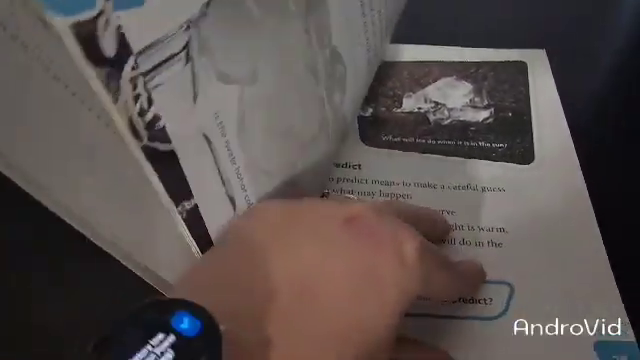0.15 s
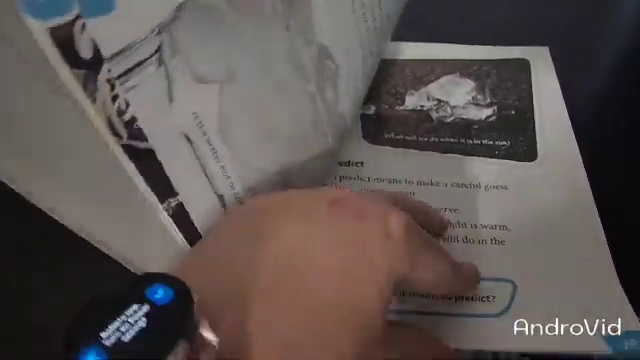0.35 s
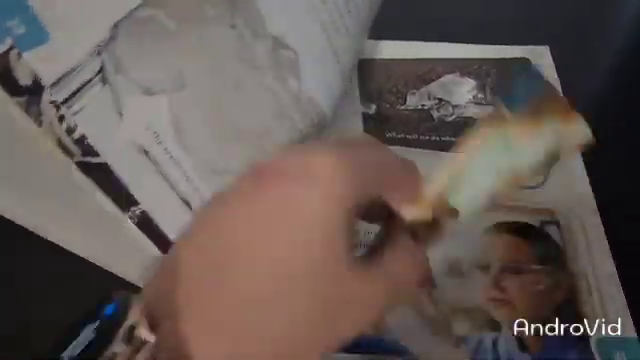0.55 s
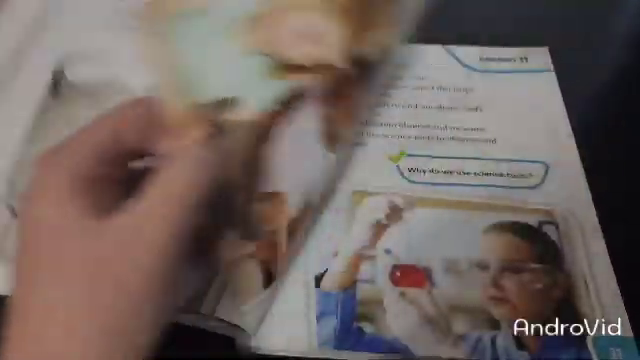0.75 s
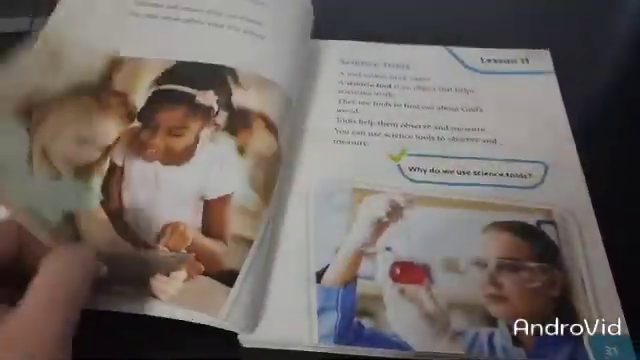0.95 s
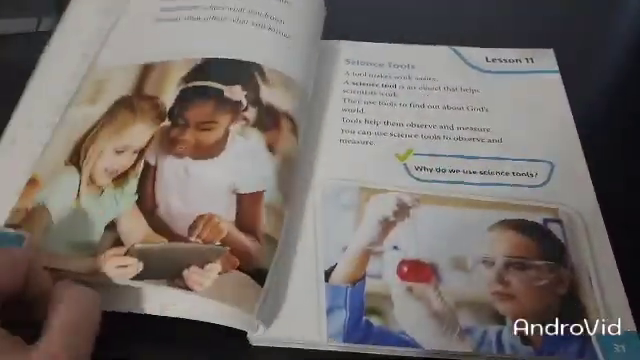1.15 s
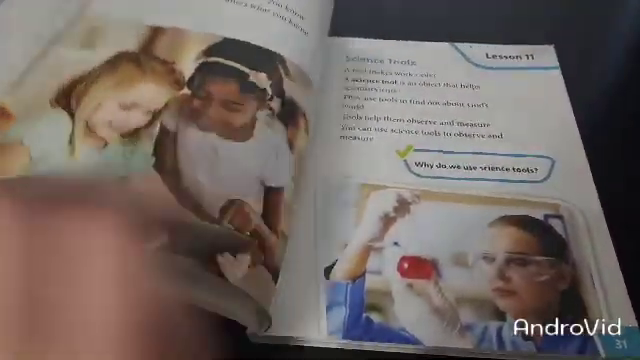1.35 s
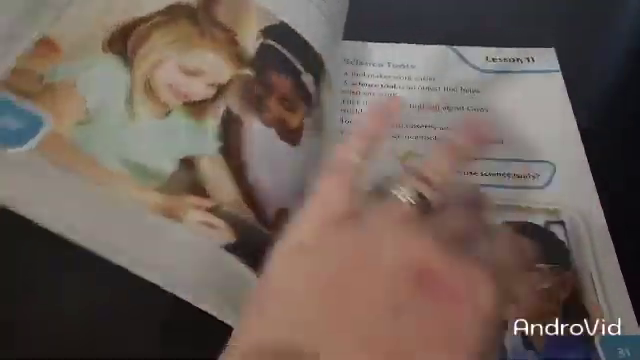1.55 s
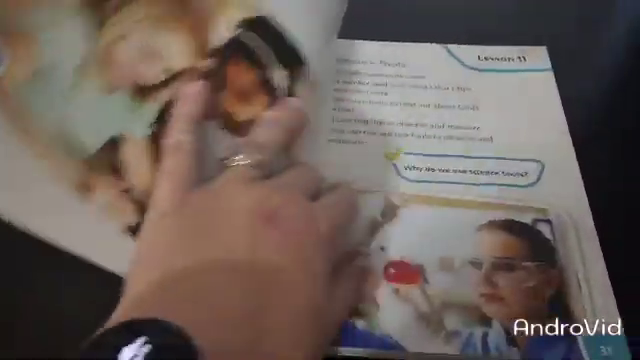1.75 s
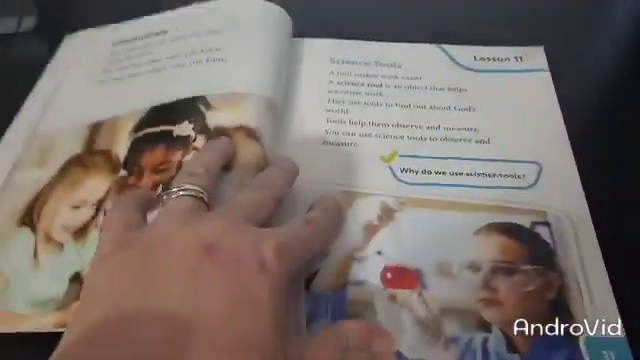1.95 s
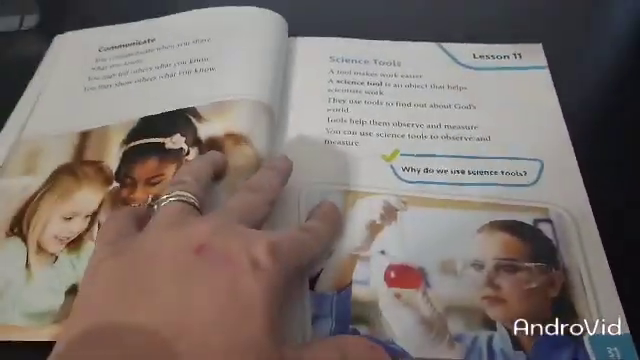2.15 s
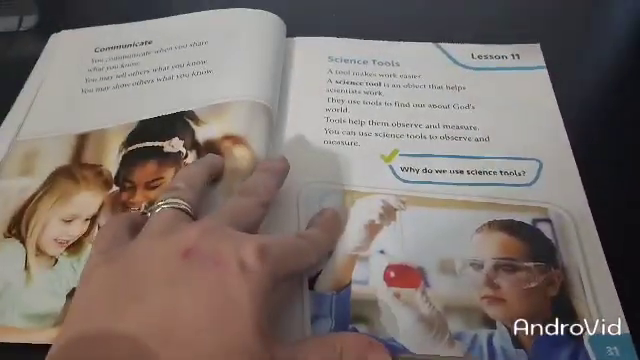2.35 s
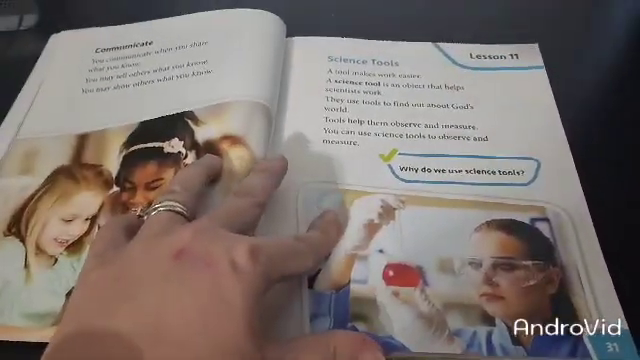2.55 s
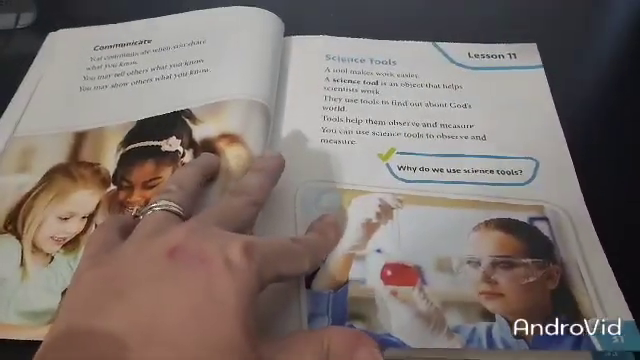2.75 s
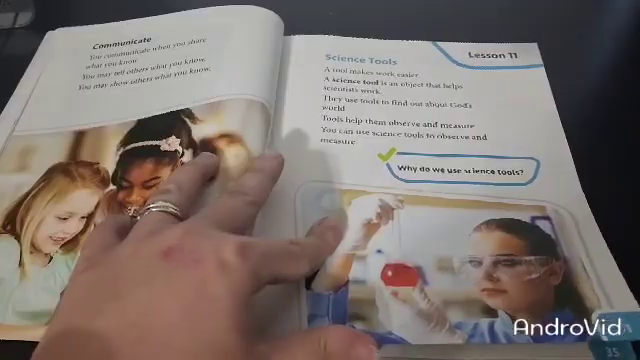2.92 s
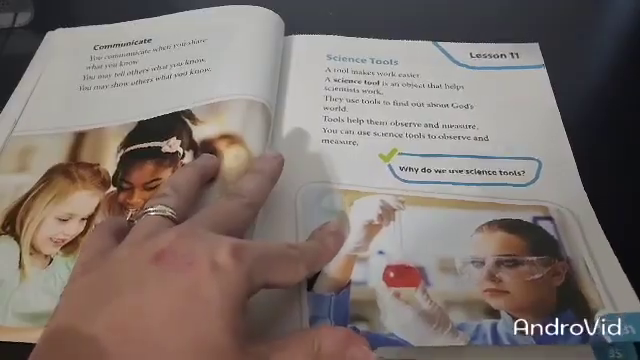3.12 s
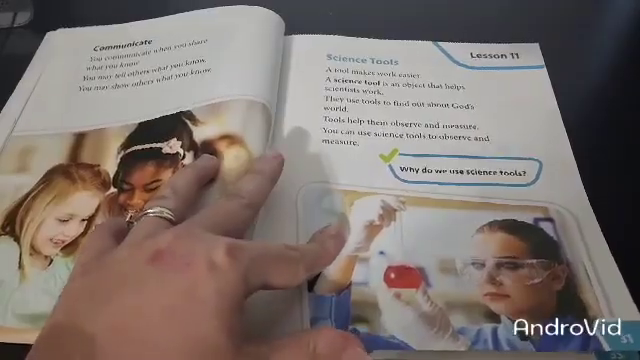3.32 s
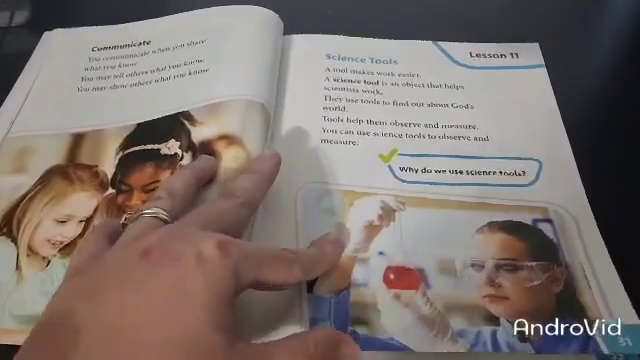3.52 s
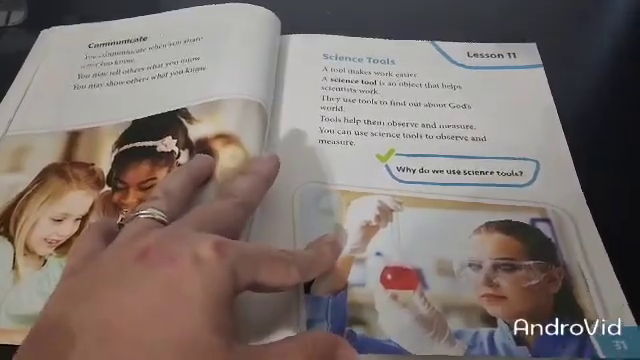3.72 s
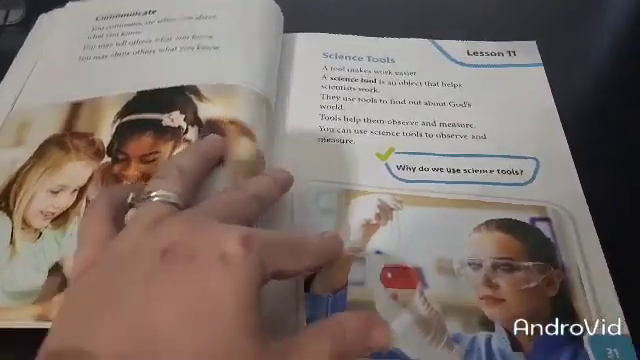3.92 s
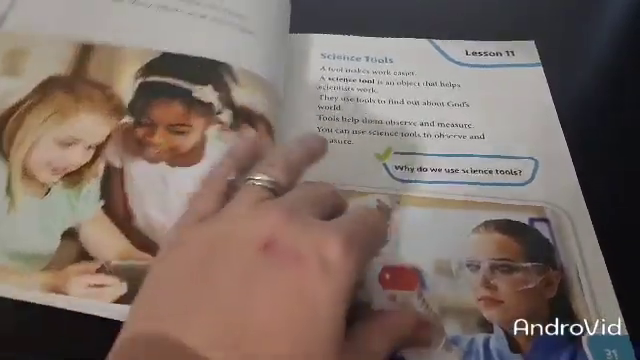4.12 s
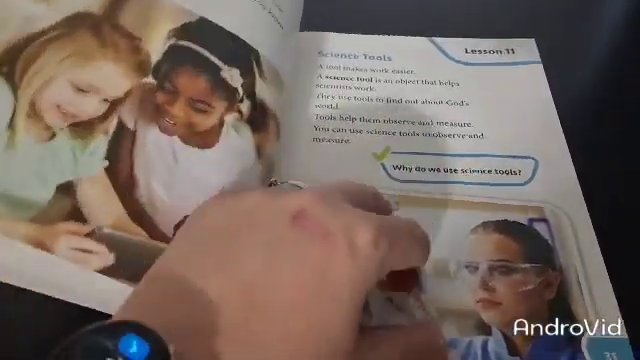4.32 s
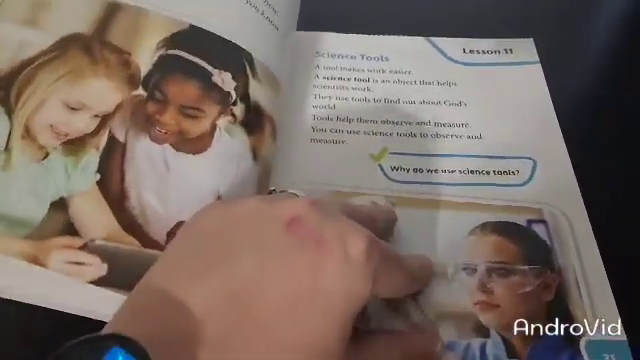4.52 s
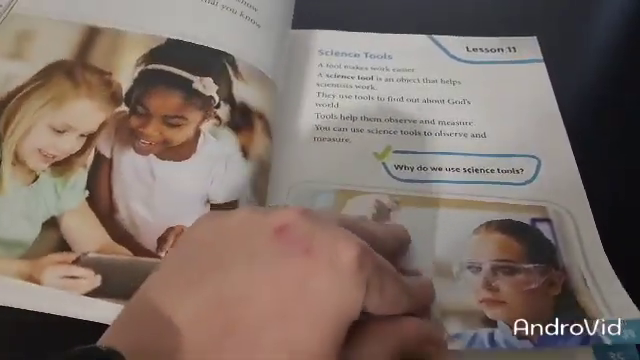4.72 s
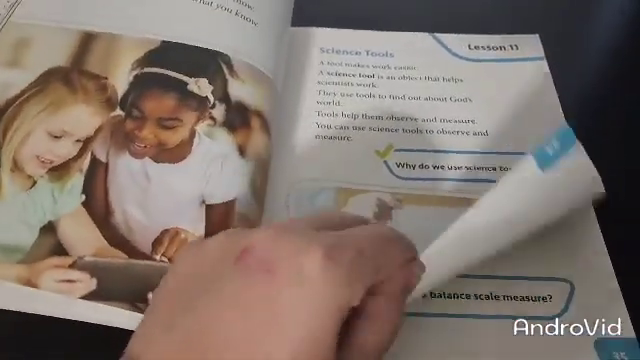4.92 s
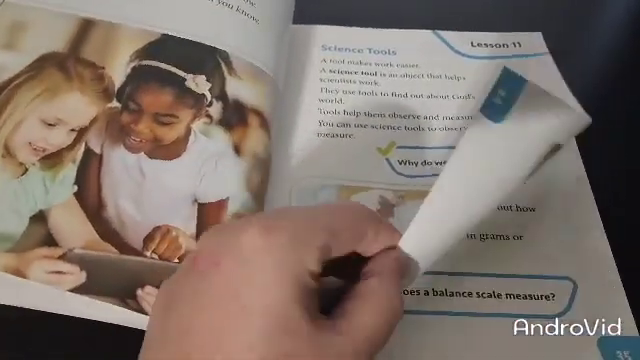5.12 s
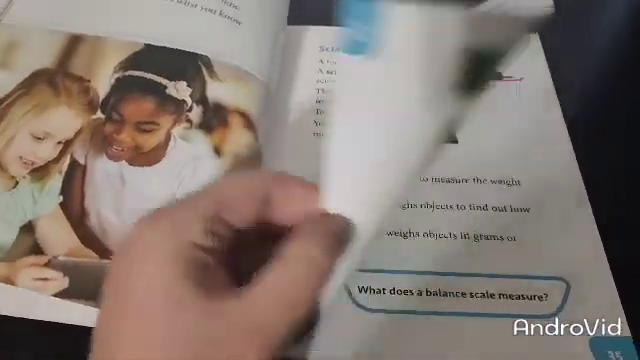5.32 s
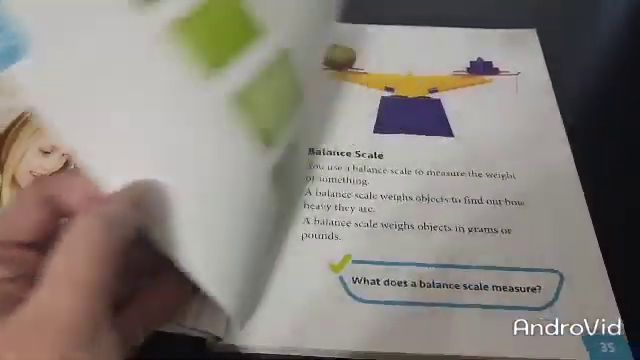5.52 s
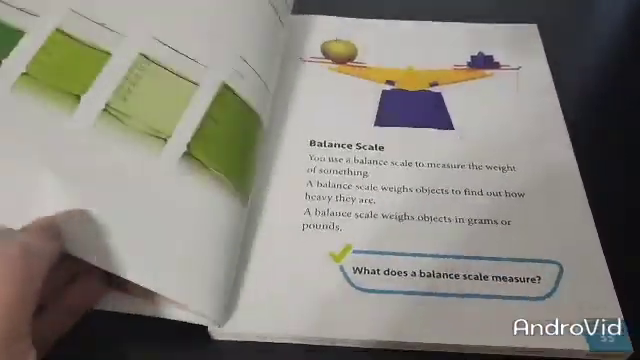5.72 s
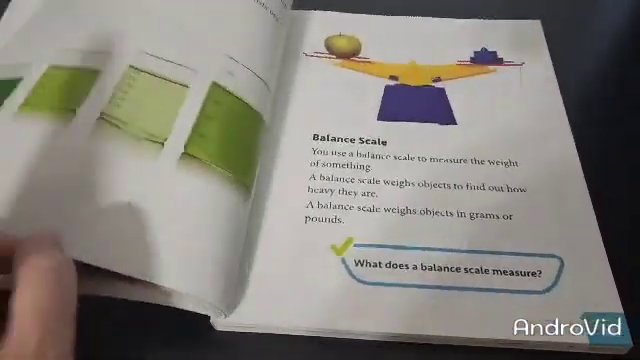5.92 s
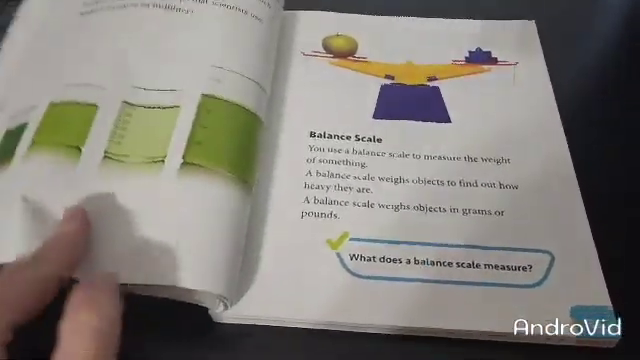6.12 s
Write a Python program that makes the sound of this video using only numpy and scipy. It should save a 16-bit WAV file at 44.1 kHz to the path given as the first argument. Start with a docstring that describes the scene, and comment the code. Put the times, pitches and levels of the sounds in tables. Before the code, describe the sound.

Close, dry stereo sound of a book handled on a table indoors. Dense paper rustle and short finger strokes, a page landing with bright crackling snaps, softer strokes and a thump as it is pressed flat. Almost still for nearly two seconds, then a sharp snap, flicking finger rubs, another sliding page, and one strong crack with a knock. Faint hiss and low rumble stay beneath.

```python
"""In a small quiet room, a hand turns glossy book pages on a table, close to a pair of microphone ports.
Sliding paper rustles by friction noise and sparse crackle; finger strokes slip as short rubbing bursts.
Creases snap as buckling pulses with ringing and crackle; the page block taps by damped modes and a boom.
Moving air, a wavering ventilation note, a low rumble and a faint hiss are shaped diffuse noise."""
import sys
import numpy as np
from scipy import signal
from scipy.fft import rfft, irfft
from scipy.io import wavfile
from scipy.ndimage import uniform_filter1d

SR = 44100
rng = np.random.default_rng(int(sys.argv[2]) if len(sys.argv) > 2 else 0)


def put_to_file(sound):
    """Save the sound as 16-bit audio at rate SR, in the file named by the first command-line argument."""
    columns = np.atleast_2d(sound).T  # one column per channel
    safe = np.clip(columns, -1, 1)
    whole_steps = np.round(safe * 32767)
    wavfile.write(sys.argv[1], SR, whole_steps.astype(np.int16))


N = 276507  # samples

# Levels are set ahead of the port response; spectra give only relative density.
# Sliding paper. Each row: time in seconds, level in dB, fine sheen in dB re papery middle,
# fold hollow in Hz, skin whisper in dB re papery middle.
RUSTLE_PATH = [(0.0, -56.5, -14, 1550, -29), (0.27, -67, -18, 1310, -25), (0.47, -54, -5.5, 1640, -33),
               (0.66, -59.5, 5, 1380, 1), (0.8, -56, -5, 1610, -11), (0.88, -48.5, -5.5, 1240, -25),
               (0.95, -55.5, -2.5, 1640, -18), (1.03, -45.5, 2.5, 1720, -27),
               (1.15, -54.5, -1.5, 1150, -13), (1.21, -66, -10, 1176, -23), (1.53, -68.5, -11, 1160, -8),
               (1.72, -59.5, 2.5, 920, 0), (1.9, -70, 4, 1090, 3.5), (2.02, -64.5, -6, 1000, -3),
               (2.2, -75.5, -9, 786, -20), (3.8, -80, -8.5, 1150, -12), (3.95, -71, -4, 1290, 3),
               (4.19, -61.5, -13, 1510, -15), (4.37, -63, -10, 1480, -23), (4.45, -66, -18, 1460, -19),
               (4.95, -69, -3.5, 1660, 3.5), (5.27, -62.5, -5, 1770, -20), (5.35, -65.5, -17, 860, -16),
               (5.54, -60.5, -6, 880, -13), (5.6, -55.5, -6, 910, -13), (5.78, -53.5, -6, 960, -11),
               (5.87, -63.5, -6.5, 1720, -10), (5.98, -52.5, -5.5, 1240, -18),
               (6.11, -59.5, -5.5, 1390, -16), (6.27, -58, -4.5, 2140, -14)]
# Lifted pages arching over the block. Each row: middle in seconds, half-length in seconds, hollow gain in dB.
PAGE_ARCHES = [(.38, .06, 7), (1.675, .02, 9), (1.84, .04, 6), (5.45, .07, 11), (5.66, .11, 11),
               (6.2, .06, 6)]
# Finger strokes across a page. Each row: start in seconds, peak in dB, body and sheen in dB re papery
# middle, hold in seconds, ring in Hz, ring in dB re rub.
FINGER_SLIPS = [(0.337, -48, -4, -14, 0.025, 1400, -14), (0.431, -39.5, -29, -11, 0.064, 1840, -1.5),
                (0.566, -38, -29, -10, 0.027, 4500, -26), (0.631, -31, -21, -7, 0.049, 1680, -9),
                (0.805, -40, -6, -15, 0.053, 1910, -13.5), (1.09, -31, -15, -22, 0.031, 7050, -42),
                (1.229, -51.5, 3, -2, 0.065, 7550, -1), (1.663, -40, -5, -19, 0.018, 5200, -16),
                (1.982, -34, -8, -0.5, 0.034, 5070, -40), (2.366, -51.5, -34, -8, 0.025, 7700, -16),
                (3.064, -53, -8, -13, 0.047, 6000, -26), (3.187, -60, -17, -15.5, 0.033, 1660, -17),
                (3.481, -53.5, -2, -16, 0.032, 5400, -13), (3.515, -48, -13, -14, .04, 5240, -30),
                (3.912, -52.5, -4, -6, 0.042, 1550, -21), (3.995, -51.5, -18, -12, 0.026, 5700, 10),
                (4.194, -40.5, -13.5, -3, 0.11, 1340, -20), (5.012, -39.5, -29, -8, 0.036, 2220, -14),
                (5.052, -40.5, -7.5, 1.5, 0.019, 2200, -8), (5.147, -38.5, -7.5, -4.5, 0.013, 2130, -8),
                (5.194, -35.5, -3, -6, 0.0075, 4100, -18), (5.236, -37, -6.5, -2.5, 0.02, 2320, -12),
                (5.31, -45, -0.5, -12, 0.0082, 4400, -9), (5.458, -46.5, 3, -14, 0.029, 5270, -3),
                (5.619, -42, -3, 3, 0.096, 4640, -14), (5.699, -44, -10, -11, 0.057, 7600, 7),
                (6.016, -46, -6, 13, 0.006, 4500, -15), (6.131, -40.5, -20, -9, 0.022, 5660, -3)]
# Creases that let go. Each row: start in seconds, peak in dB, body and sheen in dB re papery middle,
# left-right difference in dB, ring in Hz, ring gain in dB, crackle in dB.
CREASE_SNAPS = [(0.9866, -19, 0, -18, -1, 3700, 15.5, 1), (0.9903, -14, -11, -54, 1, 2400, 19, -17.5),
                (0.9926, -13, -12, -24, 0, 3870, 20, 6), (1.0025, -27.5, -8, -15, -10, 6800, 20, -8),
                (1.0112, -20, -14, -17, 1, 3330, 31, -2), (1.022, -22, -15, -35, 7.5, 2980, 38, -5),
                (1.047, -32, -14, -12, 2, 3700, 7, -7), (1.1075, -43, -13, -16, 1, 6940, 7, -4),
                (1.9906, -23, 2.5, -19, -0.5, 1440, 16, -24.5), (3.808, -33.5, -21, -7, -5, 4320, -6, -17),
                (4.2401, -16.5, -24, -6, -7, 1750, 4, -10), (4.2417, -16, -6.5, 5.5, 7, 4470, 0, -11),
                (4.2427, -22, -32, 12, -21.5, 6540, -2, 8), (6.0265, -7, -5, -22, 0, 4040, 6.5, -18)]
# Pages and fingers landing on the block. Each row: start in seconds, peak of knock and scuff in dB,
# pitch in Hz, t60 in seconds, boom in dB, boom in Hz, scuff in dB re knock.
BLOCK_TAPS = [(0.618, -28.5, 895, 0.037, -70, 137, 6), (0.863, -39.5, 1106, 0.041, -45.5, 150, 2),
              (1.002, -25.5, 733, 0.061, -37.5, 248, 11.5), (1.122, -38.5, 750, 0.065, -42, 129, 7),
              (1.263, -39, 820, 0.097, -75, 200, 8), (1.734, -33, 865, 0.034, -44.5, 124, -5),
              (1.76, -44, 1040, 0.06, -47, 245, -15), (1.783, -51, 794, 0.023, -47, 312, -10),
              (1.991, -31.5, 674, 0.084, -47, 355, -12), (2.141, -48, 730, 0.11, -76, 138, -2.5),
              (3.917, -54, 940, 0.028, -62, 200, 5), (5.395, -50, 820, 0.03, -49.5, 332, 8),
              (5.634, -46, 910, 0.056, -54, 335, -1), (5.774, -40, 950, 0.031, -43, 282, 11),
              (5.896, -35, 1880, 0.01, -47, 325, -7), (6.011, -32, 940, 0.045, -36, 125, 9),
              (6.027, -25, 1230, 0.091, -40, 241, 20)]
# Air pushed by swinging pages and hands. Each row: middle in seconds, half-length in seconds, swell in dB.
AIR_WAFTS = [(0.0, 0.29, -62), (0.66, 0.21, -56), (0.9, 0.11, -56), (1.45, 0.068, -74), (1.73, 0.13, -57),
             (2.246, 0.13, -60.5), (4.76, 0.13, -62), (5.004, 0.04, -56), (5.33, 0.11, -63),
             (5.735, 0.11, -61.5)]

# Spectrum of the flexing body. Each row: frequency in Hz, density in dB per Hz.
BODY_SPECTRUM = [(210, -32), (350, 5), (445, -9.5), (705, -10), (854, 1.5), (1900, -5.5), (2470, -15),
                 (4180, -120)]
# Spectrum of the papery middle range. Each row: frequency in Hz, density in dB per Hz.
PAPER_SPECTRUM = [(760, -48), (1300, -5), (1820, -8), (2050, -7), (2220, -7.5), (2900, -4.5), (3440, -3),
                  (3790, -4), (7160, -2.5), (10200, -11), (13300, -24.5), (22000, -120)]
# Spectrum of the fine sheen. Each row: frequency in Hz, density in dB per Hz.
SHEEN_SPECTRUM = [(5880, 6), (10000, 16.5), (10800, 14), (11700, 16), (14800, 14.5), (15400, 14),
                  (15900, -43)]
# Spectrum of skin on gloss. Each row: frequency in Hz, density in dB per Hz.
WHISPER_SPECTRUM = [(3000, -22), (4500, -10), (6000, 0), (7600, 0), (9500, -20)]
# Spectrum of the ventilation rumble. Each row: frequency in Hz, density in dB per Hz.
RUMBLE_SPECTRUM = [(50, -54), (85, 1.5), (92, -18), (108, -1.5), (129, -0.5), (146, -9), (172, -8),
                   (190, -13.5), (275, -6.5), (355, -22), (471, -25.5), (603, -32), (700, -28), (910, -68),
                   (1540, -120)]
# Spectrum of the faint hiss. Each row: frequency in Hz, density in dB per Hz.
HISS_SPECTRUM = [(300, 4.5), (500, -2.5), (700, 0), (1000, -3.5), (1500, -5.5), (2500, -7), (3500, -5.5),
                 (5000, -10), (7500, -41), (9000, -56), (10200, -44), (12000, -78), (15000, -24),
                 (16000, -24)]

# Coherence of diffuse sound. Each row: frequency in Hz, left-right likeness from 0 to 1.
DIFFUSE_LIKENESS = [(60, 0.97), (180, 0.94), (550, 0.55), (1650, 0.15), (4970, 0.01), (15000, 0.0145)]
# Decay of the room. Each row: frequency in Hz, t60 in seconds.
ROOM_DECAY = [(300, 0.25), (1000, 0.22), (3000, 0.2), (7000, 0.2), (14000, 0.23)]
# Unequal colour of the ports. Each row: frequency in Hz, left-right difference in dB.
PORT_DIFFERENCE = [(60, -1), (110, 0), (200, 1.5), (380, 1), (700, 5.5), (1290, 1.5), (2380, 3),
                   (4400, -5.5), (8120, -4.5), (15000, 8.5)]
# Uneven treble response, alike at both ports. Each row: frequency in Hz, gain in dB.
TREBLE_RESPONSE = [(8400, 0), (9400, -7), (10400, -7), (11400, 0), (15450, 0), (15750, -26), (16500, -30)]

RUSTLE_BODY_DB, HOLLOW_DB, WANDER_DB = -12, -17.5, 6  # shares of body and hollow, and rms drift of each
CRACKLES_PER_S = 250
SLIP_RISE_PER_HOLD, SLIP_FADE_S, SLIP_FADE_PER_HOLD = 0.1, 0.04, 2.94  # longer strokes start and end softer
SLIP_PAN_DB, TAP_PAN_DB = -2, -1.5  # left-right
CRACKLE_T60_S, FINE_SHORTENS = 0.016, 0.23  # t60 at 0 dB sheen; finer creases crackle shorter
SNAP_ROOM_DB, TAP_ROOM_DB = -8, -6  # sent to the room
LAG_S = 0.00022  # near sounds reach the right port later
STILL_AIR_DB, DRONE_DB, WAVER_DB = -65.5, -57.5, -1
RUMBLE_DB, HISS_DB = -60, -72
EDGE_HZ = 16600


def rustle():
    """Stick-slip friction: sliding crackles through the fold's hollow; the page flutters, so the level flickers."""
    s, *columns = np.transpose(RUSTLE_PATH)
    t = np.arange(N) / SR
    db, sheen_db, hollow_hz, whisper_db = (np.interp(t, s, column) for column in columns)
    body_db = RUSTLE_BODY_DB + WANDER_DB * drift(size=2000)
    hollow_db = HOLLOW_DB + bumps(PAGE_ARCHES) + WANDER_DB * drift(size=2000)

    crackle_db = 4 * np.minimum(rng.exponential(1, N), 4)
    crackle = gain_of(crackle_db) * (rng.random(N) < CRACKLES_PER_S / SR)
    drive = friction(N, 1.5, 0.3) + 2 * crackle * rng.choice([-1., 1.], (2, N))

    hollow = resonate(resonate(drive, hollow_hz, 260), hollow_hz, 310)
    whisper = gain_of(whisper_db) * coloured(drive, WHISPER_SPECTRUM)
    paper = sheet(drive, body_db, sheen_db) + gain_of(hollow_db) * hollow + whisper
    flicker_db = 0.22 * drift(size=600)
    return mottled(gain_of(db + flicker_db) * paper, 2.04)


def slip(db, body_db, sheen_db, hold, hz, ring_db):
    """Transient friction: the finger breaks loose, rubs for a moment, then the sound dies away."""
    t = np.arange(SR // 3) / SR
    rise = max(SLIP_RISE_PER_HOLD * hold, 0.0005)
    t60 = SLIP_FADE_S + SLIP_FADE_PER_HOLD * hold
    shape = np.minimum(t / rise, 1) * gain_of(-60 * np.maximum(t - hold, 0) / t60)

    rub = friction(len(t), 0.2, 0.18)
    ring = evened(signal.lfilter(*signal.iirpeak(hz, 6.5, SR), rub))
    rub = rub + gain_of(ring_db) * ring
    sound = mottled(sheet(shape * rub, body_db, sheen_db), 1.8)
    return placed(gain_of(db) * sound / abs(sound).max(), SLIP_PAN_DB)


def snap(db, body_db, sheen_db, pan_db, hz, ring_db, crackle_db):
    """Buckling instability: one sharp pulse, a patch of paper that rings briefly, and a decaying crackle."""
    t = np.arange(SR // 8) / SR
    t60 = CRACKLE_T60_S * gain_of(-FINE_SHORTENS * sheen_db)
    drive = gain_of(crackle_db - 60 * t / t60) * friction(len(t), 0.62, 0.5)
    drive[:, 0] += 1  # the crease lets go
    ring = signal.lfilter(*signal.iirpeak(hz, 3.5, SR), drive)
    swell = t * hz * np.exp(-t * hz / 0.21)  # about one strong cycle
    buckle = 2.54 * np.sin(2 * np.pi * 0.82 * hz * t) * swell

    sound = sheet(drive, body_db, sheen_db)
    sound = sound + gain_of(ring_db) * coloured(ring, PAPER_SPECTRUM)
    sound = sound - coloured(buckle[None], PAPER_SPECTRUM)
    return placed(gain_of(db) * sound / abs(sound).max(), pan_db)


def tap(db, hz, t60, boom_db, boom_hz, scuff_db):
    """Impact excitation of damped modes: the stacked paper rings, sheets scuff, and the table booms."""
    t = np.arange(SR // 5) / SR
    blow = friction(len(t), 0.52, 0.89) * np.exp(-t / 0.004)
    fade = gain_of(-60 * t / max(t60, 0.01))
    overtone = 0.29 * fade * np.sin(2 * np.pi * 1.56 * hz * t)
    modes = fade * (np.sin(2 * np.pi * hz * t) + overtone)
    knock = signal.fftconvolve(blow, modes[None])[:, :len(t)]

    scuff = friction(len(t), 4.2, 0.62) * (np.exp(-t / 0.00063) + 0.24 * np.sqrt(fade))
    band = signal.butter(2, [0.63 * hz, 2.44 * hz], "band", fs=SR, output="sos")
    scuff = signal.sosfilt(band, scuff)

    onset = np.minimum(t / 0.0021, 1)
    thud = (evened(knock) + gain_of(scuff_db) * evened(scuff)) * onset
    boom = np.sin(2 * np.pi * boom_hz * t) * gain_of(-60 * t / 0.07)
    return placed(gain_of(db) * thud / abs(thud).max() + gain_of(boom_db) * boom, TAP_PAN_DB)


def sheet(drive, body_db, sheen_db):
    """Plate radiation: a page sounds in three ranges, flexing body, papery middle and fine sheen."""
    body = gain_of(body_db) * coloured(drive, BODY_SPECTRUM)
    sheen = gain_of(sheen_db) * coloured(drive, SHEEN_SPECTRUM)
    return coloured(drive, PAPER_SPECTRUM) + body + sheen


def friction(size, grain_db, alike):
    """Modulated noise: fibres catch in uneven clumps; a share of the sound is alike at both ports."""
    clumps = evened(uniform_filter1d(rng.standard_normal(size), size=90))
    both, apart = rng.standard_normal(size), rng.standard_normal((2, size))
    return evened(gain_of(grain_db * clumps) * (alike * both + apart))


def resonate(x, hz, width):
    """Heterodyne resonance: shifts the curve hz down to zero, smooths over width in Hz, and shifts back."""
    turn = np.exp(2j * np.pi * np.cumsum(hz) / SR)
    r = np.exp(-np.pi * width / SR)
    smooth = signal.lfilter([1 - r], [1, -r], x / turn)
    return evened((turn * smooth).real)


def mottled(x, patchy_db):
    """Time-varying radiation: the bending sheet changes colour in small patches of time and pitch."""
    z = signal.stft(x, nperseg=256)[2]
    patches = rng.standard_normal(z.shape[:0:-1]).T
    patches = uniform_filter1d(uniform_filter1d(patches, size=4, axis=0), size=10, axis=1)
    return signal.istft(z * gain_of(patchy_db * evened(patches)), nperseg=256)[1][:, :x.shape[1]]


def placed(x, pan_db):
    """Interaural-style cues: level and arrival differences between the ports."""
    lag = round(LAG_S * SR)
    delayed = np.array([np.pad(x[0], (0, lag)), np.pad(x[1], (lag, 0))])
    return delayed * gain_of([[pan_db / 2], [-pan_db / 2]])


def room(x):
    """Reverberation: sparse reflections of random sign, each band dying at its own speed."""
    taps = np.zeros((2, SR // 2))
    at = np.arange(200, SR // 2 - 12, 12)
    at = at + rng.integers(0, 12, (2, len(at)))
    np.put_along_axis(taps, at, rng.choice([-1., 1.], at.shape), 1)
    hz, t, z = signal.stft(taps, SR, nperseg=256)
    decay = gain_of(-60 * t / read(ROOM_DECAY, hz)[:, None])
    tail = signal.istft(z * decay, SR, nperseg=256)[1]
    return signal.fftconvolve(x, tail / np.linalg.norm(tail[0]), axes=1)[:, :N]


def waft():
    """Turbulent pressure: moving air makes a lumpy rumble at the very bottom, swelling with each gust."""
    gusts = gain_of(STILL_AIR_DB) + bumps((s, length, gain_of(db)) for s, length, db in AIR_WAFTS)
    return gusts * field([(15, -13.5), (25, -10.5), (42, 8.5), (60, -64)], 4096, 2.5)  # (Hz, dB per Hz)


def ventilation_note():
    """Narrow-band noise: the ventilation's fuzzy note wavers slowly in level."""
    note = field([(45, -21), (60, 16.5), (66, 23.5), (73, 26), (95, -75)], 16384, 0.98)  # (Hz, dB per Hz)
    return gain_of(DRONE_DB + WAVER_DB * drift(size=3000)) * note


def ventilation_rumble():
    """Diffuse field: low broadband ventilation noise fills the room."""
    return gain_of(RUMBLE_DB) * field(RUMBLE_SPECTRUM, 4096, 2.4)


def hiss():
    """Diffuse field: a faint broadband noise lies under everything."""
    return gain_of(HISS_DB) * field(HISS_SPECTRUM, 512, 1.0)


def field(spectrum, size, patchy_db):
    """Partial coherence: diffuse noise of unit rms at both ports, with drifting patches."""
    frames, hz = 4 * N // size + 5, np.fft.rfftfreq(size, 1 / SR)
    a, b, c, d, patches = rng.standard_normal((frames, len(hz), 5)).T
    patches = evened(uniform_filter1d(uniform_filter1d(patches, size=6, axis=0), size=8, axis=1))
    same = np.clip(read(DIFFUSE_LIKENESS, hz), -1, 1)[:, None]
    left = a + 1j * b
    right = same * left + np.sqrt(1 - same ** 2) * (c + 1j * d)
    z = np.array([left, right]) * gain_of(read(spectrum, hz)[:, None] + patchy_db * patches)
    return evened(signal.istft(z, nperseg=size, noverlap=3 * size // 4)[1][:, :N])


def coloured(x, spectrum):
    """Minimum-phase filtering: a causal filter of unit energy with the given spectrum."""
    hz = abs(np.fft.fftfreq(4096, 1 / SR))
    log_gain = np.log(gain_of(np.maximum(read(spectrum, hz), -80)))
    taps = np.fft.ifft(np.exp(signal.hilbert(log_gain).conj())).real[:1024]
    return signal.oaconvolve(x, taps[None] / np.linalg.norm(taps), axes=1)[:, :x.shape[1]]


def bumps(rows):
    """Gaussian envelopes: smooth swells from rows of middle and half-length in seconds, and height."""
    t = np.arange(N) / SR
    return sum(height * np.exp(-((t - s) / length) ** 2) for s, length, height in rows)


def drift(size):
    """Low-pass random process: slow chance of unit spread."""
    return evened(uniform_filter1d(uniform_filter1d(rng.standard_normal(N), size=size), size=size))


def gain_of(db):
    """Decibel law: amplitude ratio of a level in dB."""
    return 10 ** (np.asarray(db) / 20)


def evened(x):
    """Normalisation of power: scales to unit rms."""
    return x / np.sqrt(np.mean(x ** 2) + 1e-20)


def read(points, hz):
    """Logarithmic frequency scale: interpolates a table of points at hz."""
    f, value = np.transpose(points)
    return np.interp(np.log(hz + 1), np.log(f + 1), value)


def add(mix, s, sound):
    """Superposition: adds a sound to the mix from s seconds on, cut at its end."""
    part = mix[:, round(s * SR):][:, :sound.shape[1]]
    part += sound[:, :part.shape[1]]


def scene():
    """Superposition: direct paper sounds, the room's answer to snaps and taps, and the background."""
    near, thrown = rustle(), np.zeros((2, N))
    for s, *row in FINGER_SLIPS:
        add(near, s, slip(*row))
    for s, *row in CREASE_SNAPS:
        sound = snap(*row)
        add(near, s, sound)
        add(thrown, s, gain_of(SNAP_ROOM_DB) * sound)
    for s, *row in BLOCK_TAPS:
        sound = tap(*row)
        add(near, s, sound)
        add(thrown, s, gain_of(TAP_ROOM_DB) * sound)
    background = waft() + ventilation_note() + ventilation_rumble() + hiss()
    return near + room(thrown) + background


def record(dry):
    """Linear transfer: each port has its own colour, the treble is uneven, then comes the band limit."""
    hz = np.fft.rfftfreq(N, 1 / SR)
    tilt_db = read(PORT_DIFFERENCE, hz) / 2
    response_db = np.array([tilt_db, -tilt_db]) + read(TREBLE_RESPONSE, hz)
    ports = irfft(rfft(dry) * gain_of(response_db), N)
    low_pass = signal.firwin(511, EDGE_HZ, window=("kaiser", 9), fs=SR)
    return signal.oaconvolve(ports, low_pass[None], "same")


dry = scene()
out = record(dry)
put_to_file(out)
```